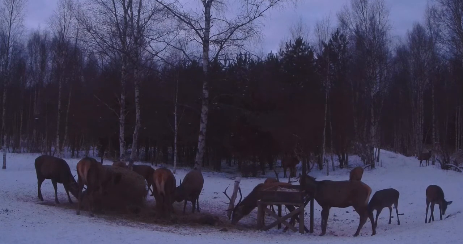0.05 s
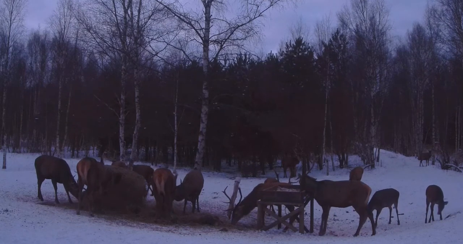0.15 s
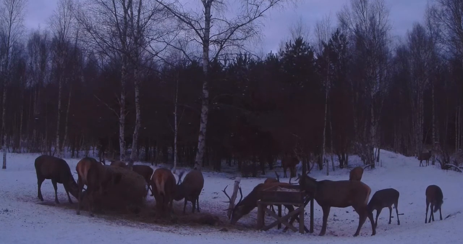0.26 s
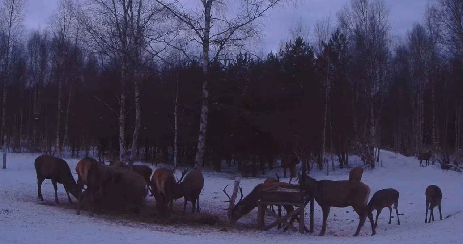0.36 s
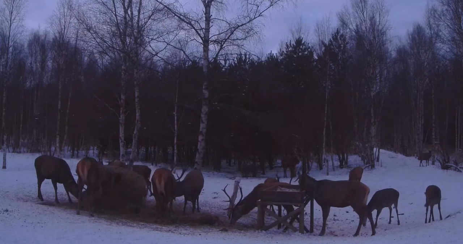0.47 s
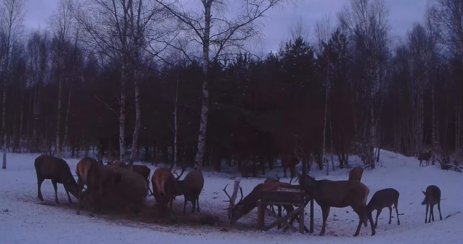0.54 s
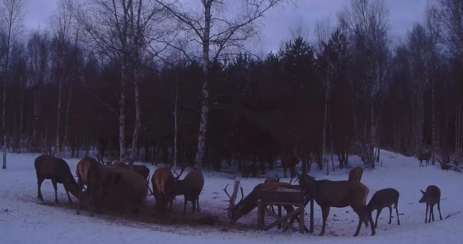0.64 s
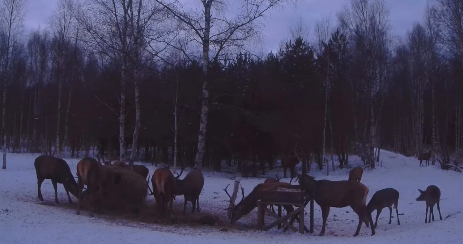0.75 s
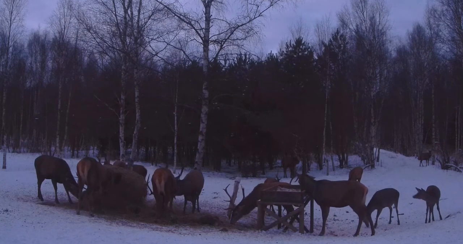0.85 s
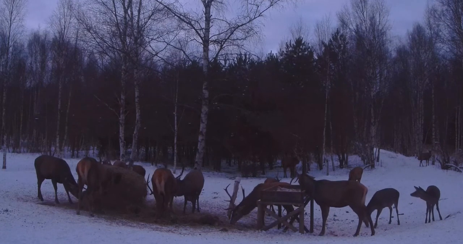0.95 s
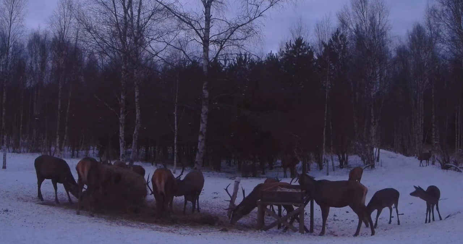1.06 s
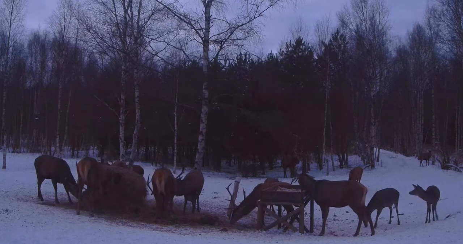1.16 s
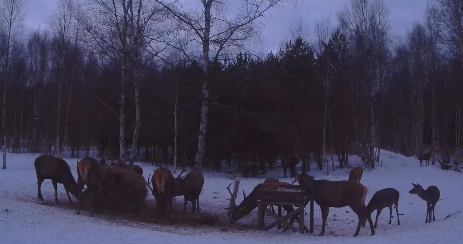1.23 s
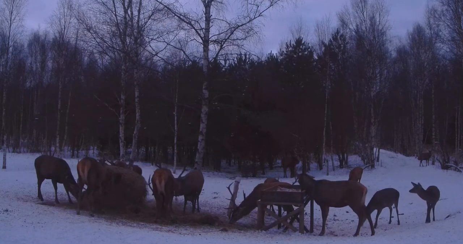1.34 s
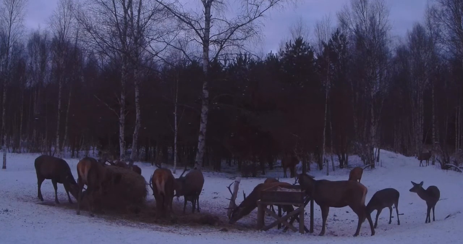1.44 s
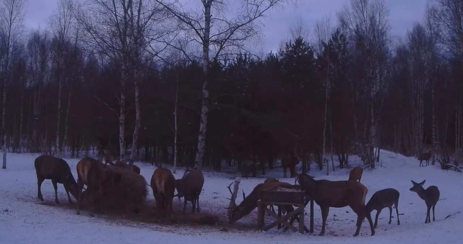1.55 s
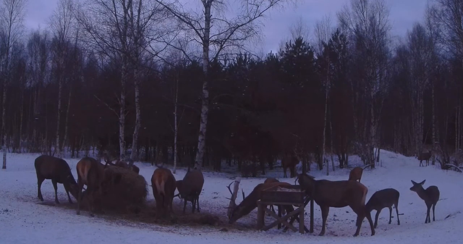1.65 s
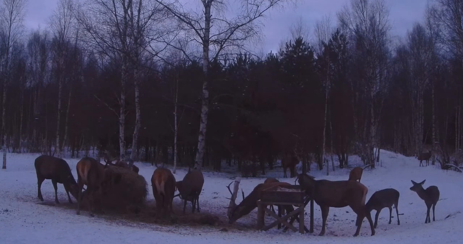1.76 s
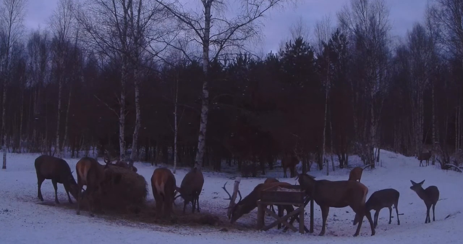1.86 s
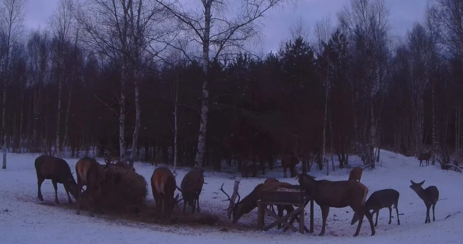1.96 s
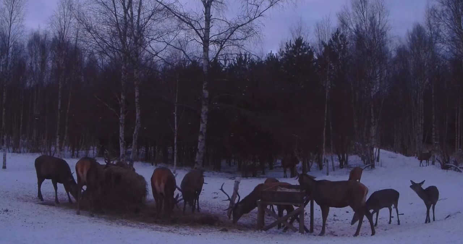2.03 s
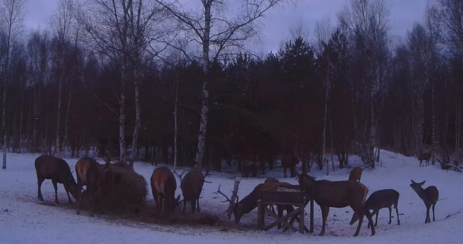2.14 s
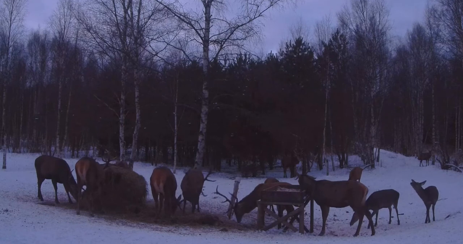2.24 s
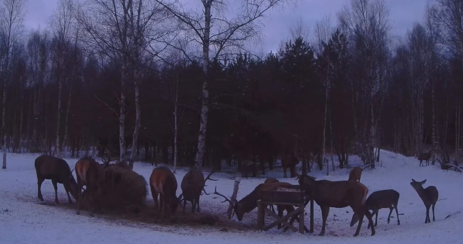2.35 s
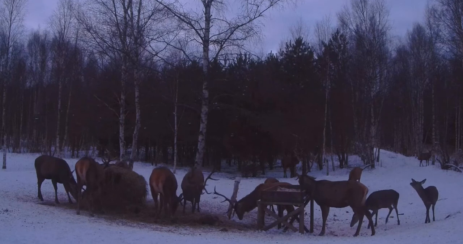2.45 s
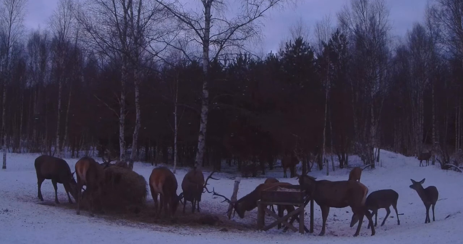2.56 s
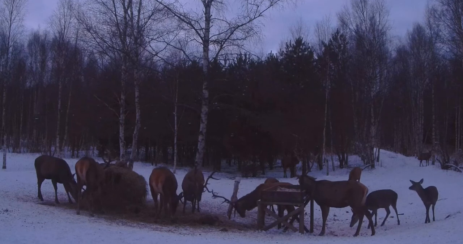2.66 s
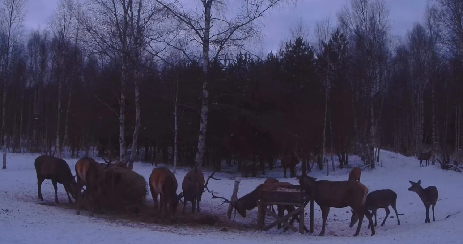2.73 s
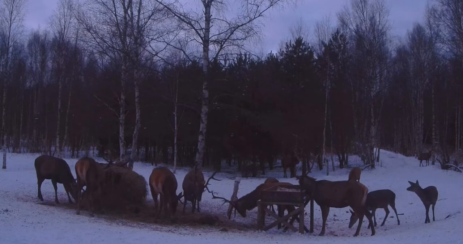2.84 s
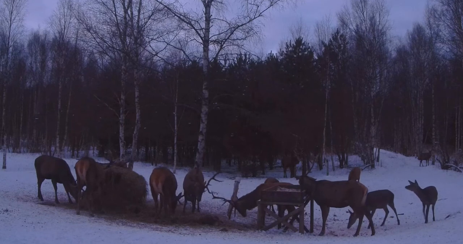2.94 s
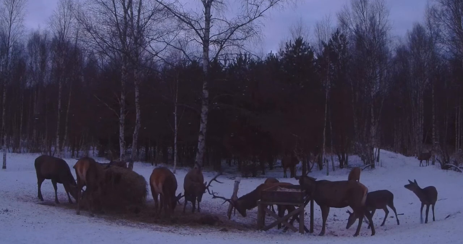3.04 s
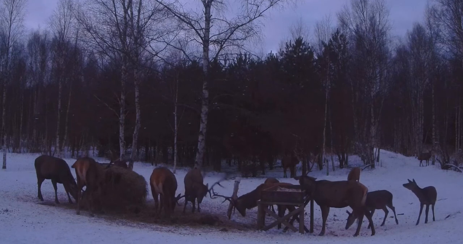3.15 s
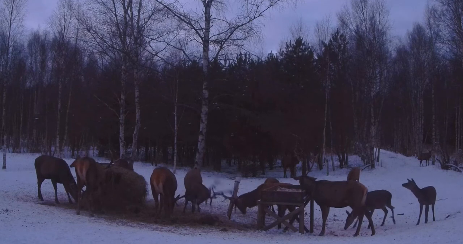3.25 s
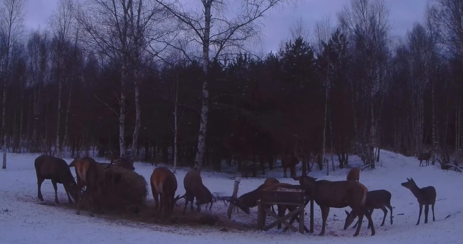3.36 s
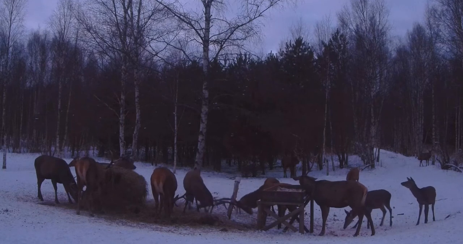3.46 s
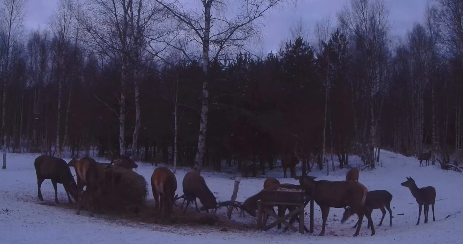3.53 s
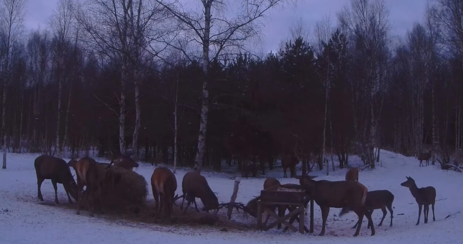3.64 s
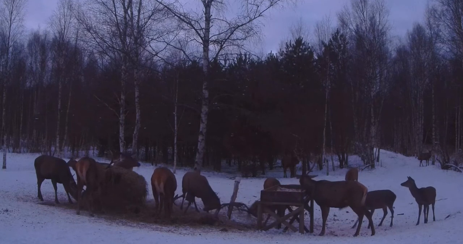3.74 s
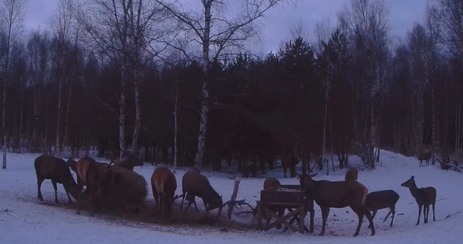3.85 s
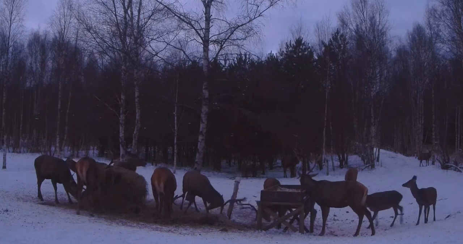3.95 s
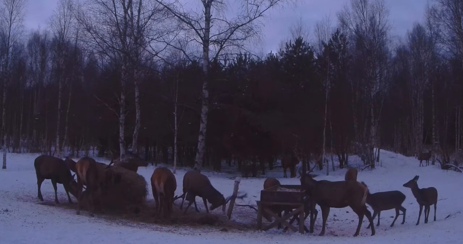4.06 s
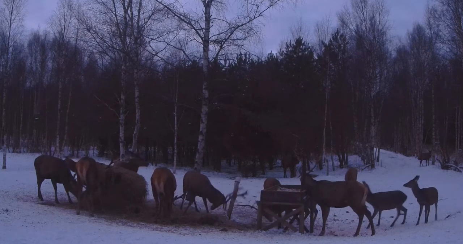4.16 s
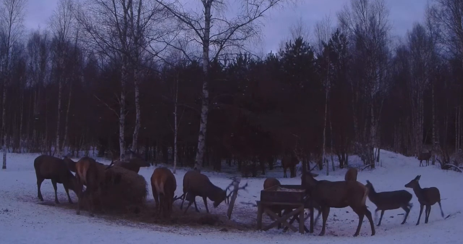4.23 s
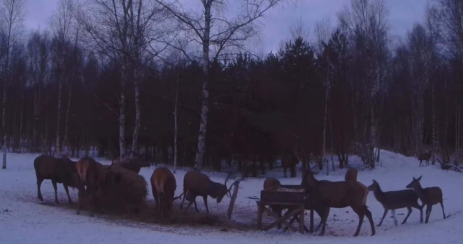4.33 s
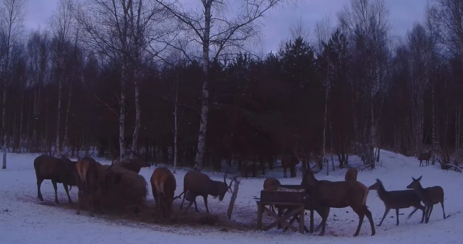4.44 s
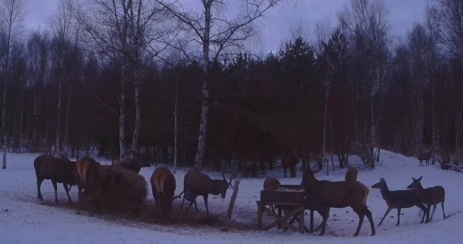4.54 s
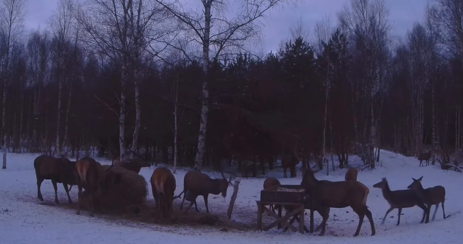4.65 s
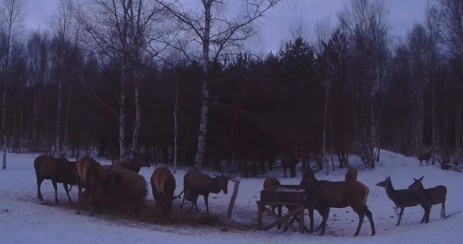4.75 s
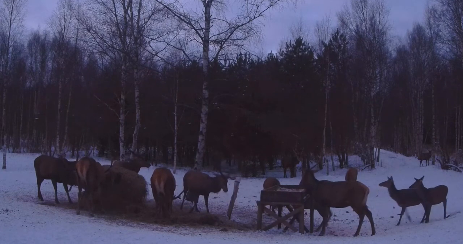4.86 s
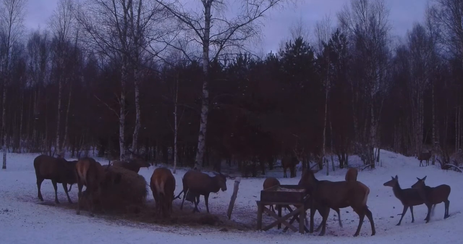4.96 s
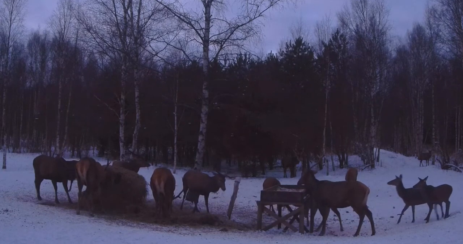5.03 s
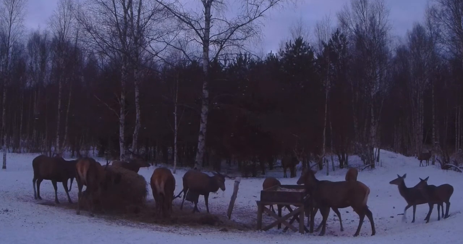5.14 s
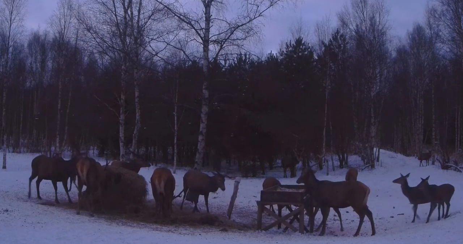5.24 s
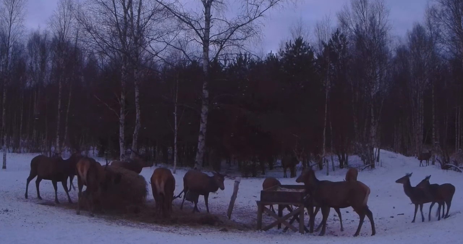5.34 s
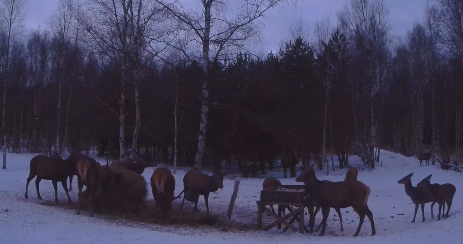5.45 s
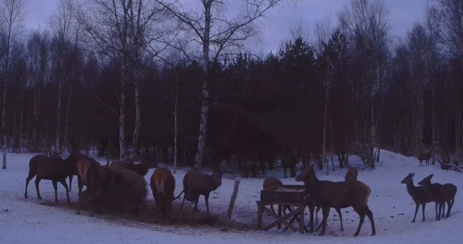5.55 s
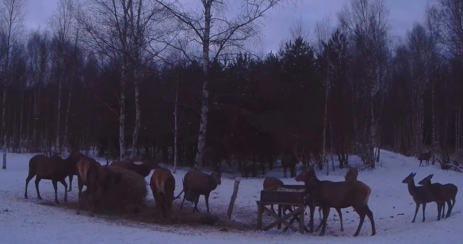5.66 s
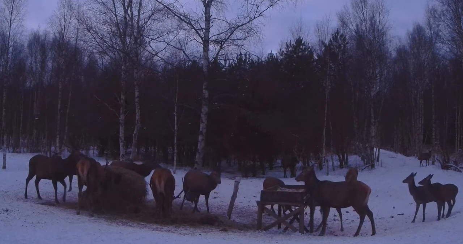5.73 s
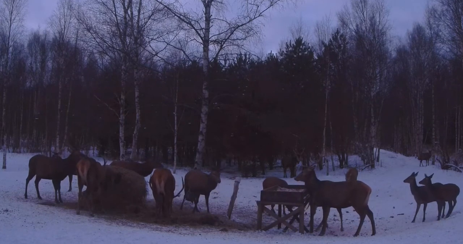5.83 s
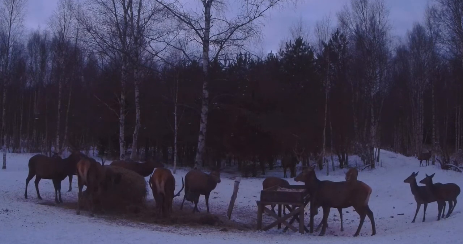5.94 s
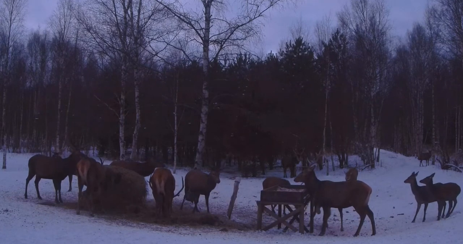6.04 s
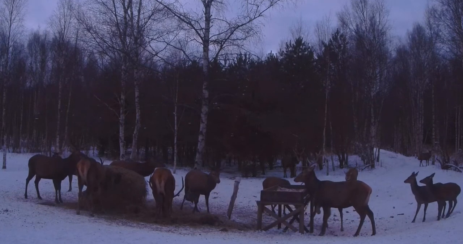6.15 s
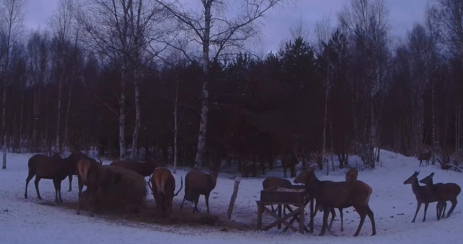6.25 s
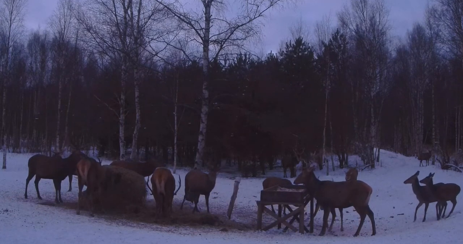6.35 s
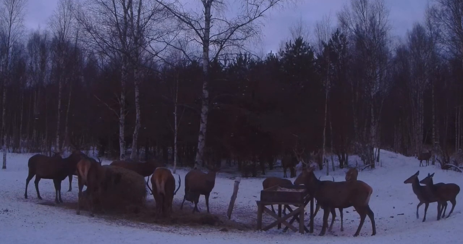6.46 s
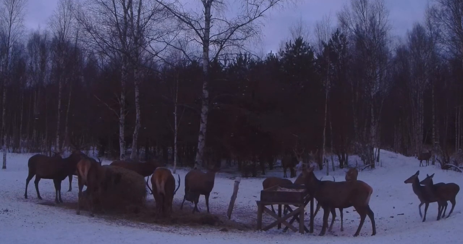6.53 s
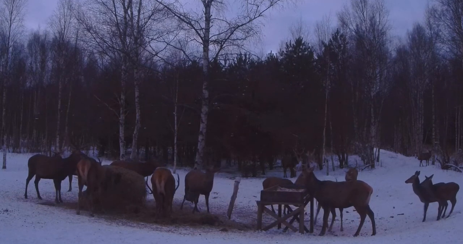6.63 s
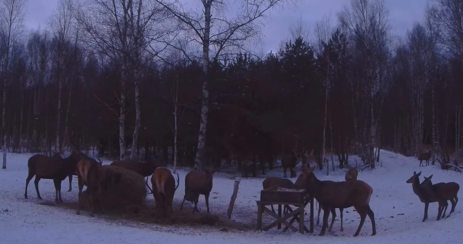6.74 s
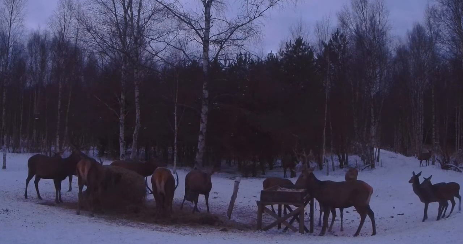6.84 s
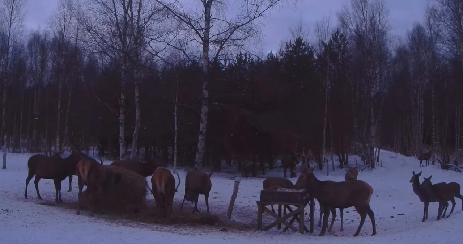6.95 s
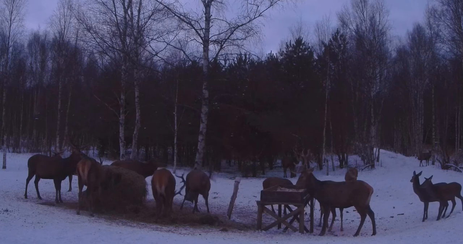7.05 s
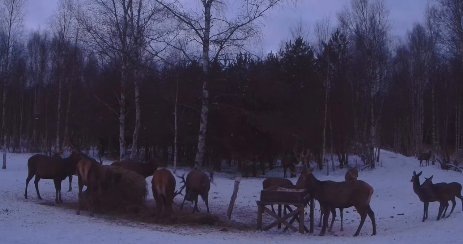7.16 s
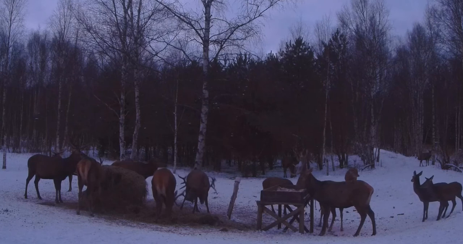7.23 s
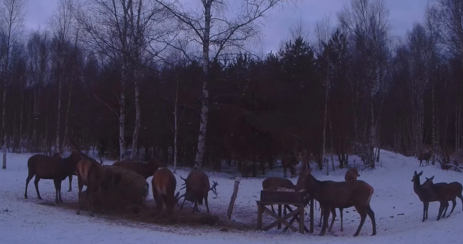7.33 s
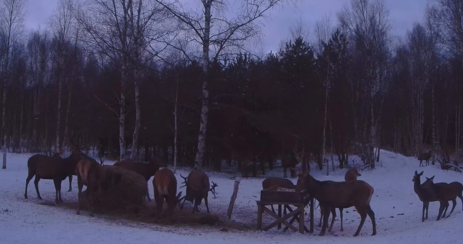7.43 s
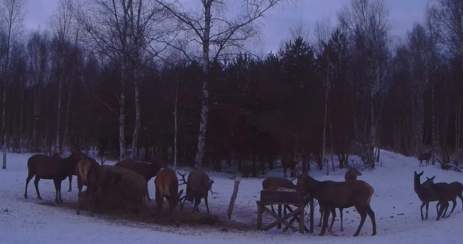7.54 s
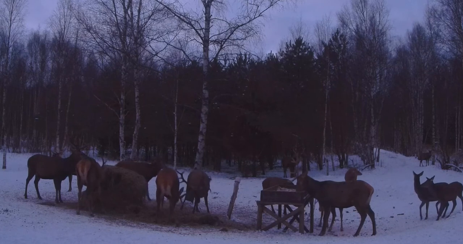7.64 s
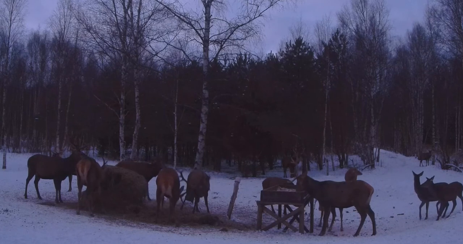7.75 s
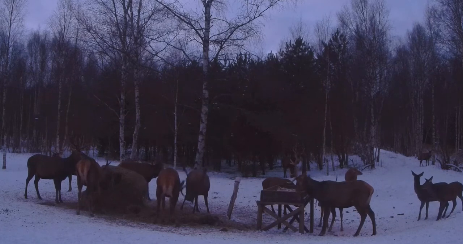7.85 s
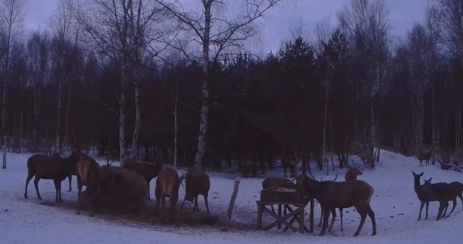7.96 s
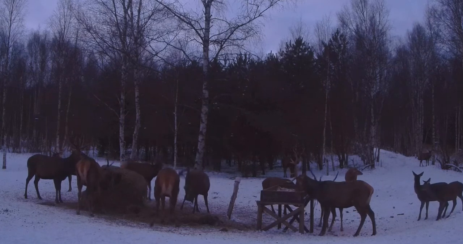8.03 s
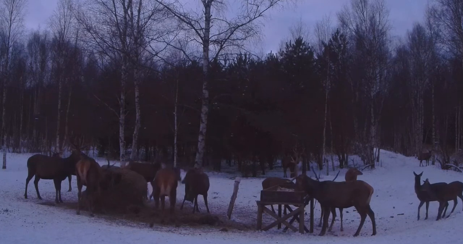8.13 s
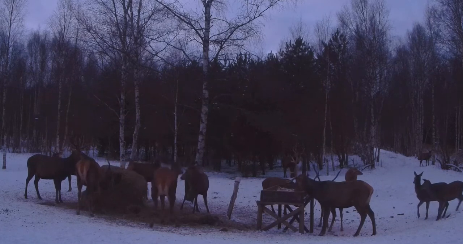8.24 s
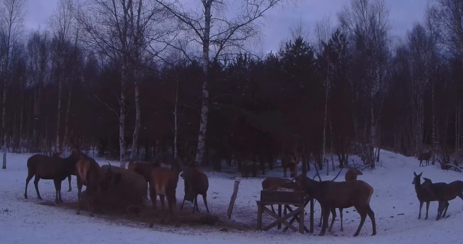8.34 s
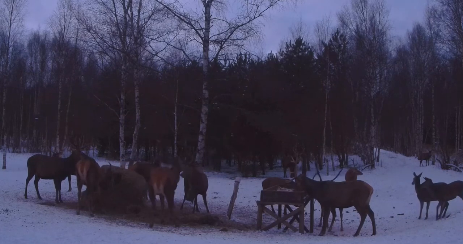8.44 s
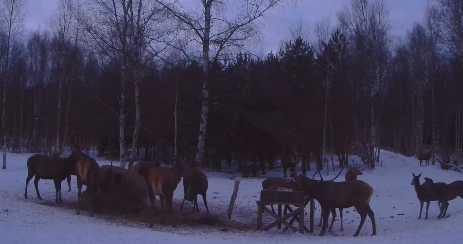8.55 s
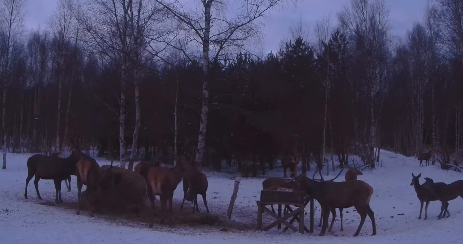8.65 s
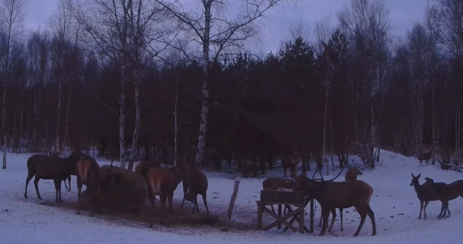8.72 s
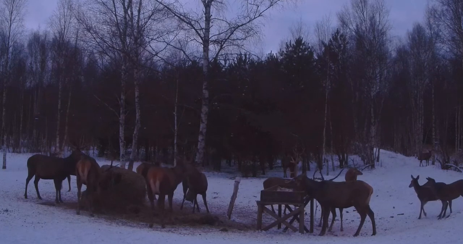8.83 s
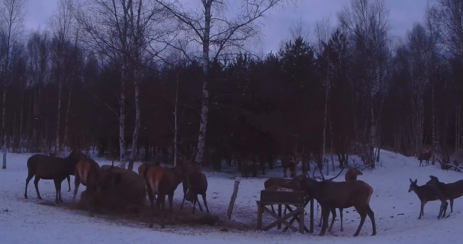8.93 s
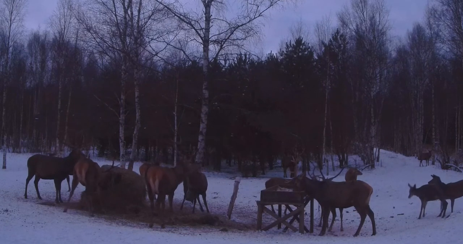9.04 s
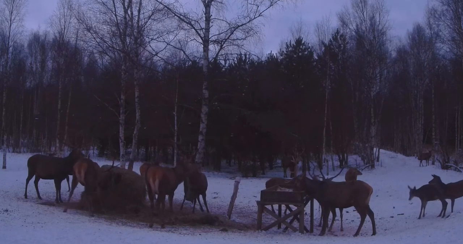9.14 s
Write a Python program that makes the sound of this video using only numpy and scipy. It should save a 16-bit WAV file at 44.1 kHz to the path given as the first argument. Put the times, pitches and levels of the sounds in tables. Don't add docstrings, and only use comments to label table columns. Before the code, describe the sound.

Outdoors at a snowy forest edge, deer rustle softly in hay with small dry snaps and a few dull feeder knocks. Two stags then lock antlers: sharp bony clacks, a pause, chattering grinding and a heavy crusty crunch. Wooden knocks follow, then a second short burst of clacks, fading into rustle. Soft woodland echo, faint treetop roar and low wind buffeting on a fixed microphone at some distance.

```python
import sys
import numpy as np
from scipy import signal
from scipy.fft import rfft, irfft
from scipy.io import wavfile
from scipy.ndimage import uniform_filter1d

SR = 44100
rng = np.random.default_rng(int(sys.argv[2]) if len(sys.argv) > 2 else 0)


def invert_db(level):
    return 10 ** (np.asarray(level, dtype=float) / 20)


def put_to_file(sound):
    columns = np.atleast_2d(sound).T
    safe = np.clip(columns, -1, 1)
    whole_steps = np.round(safe * 32767)
    wavfile.write(sys.argv[1], SR, whole_steps.astype(np.int16))


N = 405279

# pitch_hz [Hz], level_db [dB]
ANTLER = [(150, -20), (400, -12), (900, -6), (2000, -6), (3200, -1.5), (5000, -3), (8000, -2), (9500, -17),
          (15000, -26)]
PLANK = [(150, -26), (400, -16), (900, -5), (2000, -3.5), (4000, -6), (8000, -10.5), (9500, -16),
         (15000, -32)]
STALK = [(150, -44.5), (1200, -26), (3000, -9), (5000, -3.5), (8000, -4), (9500, -10), (15000, -22.5)]
# pitch_hz [Hz], time to fall 60 dB t60_s [s]
ANTLER_T60 = [(150, 0.092), (1000, 0.044), (3000, 0.016), (8000, 0.01), (15000, 0.0074)]
PLANK_T60 = [(150, 0.057), (1000, 0.039), (3000, 0.016), (8000, 0.017), (15000, .006)]
STALK_T60 = [(150, .011), (3000, 0.0067), (15000, 0.0041)]
SNAP_CHATTER_MS = 2.3
TICK_DB, TICK_PER_TIP = 1.5, 0.55


def evened(x):
    return x / np.sqrt(np.mean(x ** 2) + 1e-20)


def read(points, hz):
    f, value = np.transpose(points)
    return np.interp(np.log(hz + 1), np.log(f + 1), value)


def add(mix, s, sound):
    part = mix[round(s * SR):][:len(sound)]
    part += sound[:len(part)]


def noise(colour, size, curve, patchy_db, flicker_db, tilt=False):
    # pitch_hz [Hz], share [0 = none]
    dull = [(500, 1.1), (1500, 1.24), (3500, 0.35), (6000, 0), (16000, 0)]
    hop = size // 4
    frames, hz = N // hop + 5, np.fft.rfftfreq(size, 1 / SR)
    real, imaginary, patches = rng.standard_normal((frames, len(hz), 3)).T
    flicker = flicker_db * evened(uniform_filter1d(patches[0], size=3))
    patches = uniform_filter1d(uniform_filter1d(patches, size=8, axis=0), size=10, axis=1)
    level = read(colour, hz)[:, None] + patchy_db * evened(patches) + flicker
    inside = (hz >= colour[0][0]) & (hz <= colour[-1][0])
    z = (real + 1j * imaginary) * invert_db(level) * inside[:, None]
    scale = np.sqrt(np.mean(signal.istft(z, nperseg=size, noverlap=size - hop)[1] ** 2))
    columns = np.transpose(curve)
    if tilt:
        dullness_db = np.interp(np.arange(frames) * hop / SR, columns[0], columns[2])
        z = z * invert_db(read(dull, hz)[:, None] * dullness_db)
    x = signal.istft(z, nperseg=size, noverlap=size - hop)[1][:N] / scale
    return x * invert_db(np.interp(np.arange(N) / SR, columns[0], columns[1]))


def surges(rows, rise, fall):
    s, peak_db = np.transpose(rows)[:, :, None]
    late = np.arange(0, N, 64) / SR - s
    level = np.max(peak_db - np.maximum(-rise * late, fall * late), axis=0)
    return np.repeat(level, 64)[:N]


def body(colour, decay, low_db=0, tip_db=0, count=64):
    hz = 150 + 15000 * ((np.arange(count) + rng.random(count)) / count) ** 1.5
    low = 1 / (1 + (hz / 2200) ** 4)
    tip = 1 / (1 + (6200 / hz) ** 6)
    return np.c_[hz, read(decay, hz), read(colour, hz) + low_db * low + tip_db * tip]


def blow(peak_db, tones, modes, chatter_ms, spread_db=4., rise_ms=0, size=2600, tick_db=-99):
    t = np.arange(1500) / SR
    modes = modes + [0, 0, spread_db] * rng.standard_normal((len(modes), 1))
    hz, t60, db = np.vstack([tones, modes]).T[:, :, None]
    lag = 0.008 / (1 + (hz / 480) ** 2)
    swell = 1 - 0.7 * np.exp(-(t / lag) ** 2)
    decay = np.exp(-np.log(1000) / t60 * np.maximum(t - lag, 0))
    polarity = rng.choice([-1., 1.], hz.shape)
    rings = polarity * invert_db(db) * swell * decay * np.sin(2 * np.pi * hz * t)
    rings *= (1 - np.exp(-t / .00005)) * np.hanning(2 * len(t))[len(t):] ** 0.26

    ms = np.arange(size) * 1000 / SR
    sign, luck = rng.standard_normal((2, size))
    contacts = sign * (luck > 1.2) * invert_db(-20 * ms / max(chatter_ms, .2))
    contacts[0] = 2.63
    contacts *= np.minimum((ms + .1) / (rise_ms + 0.11), 1) * np.hanning(2 * size)[size:]
    spectrum = rfft(contacts, 2 * size)
    contacts = irfft(spectrum / uniform_filter1d(abs(spectrum), size=25))[:size]

    own = len(tones) * (rise_ms == 0)
    sound = signal.fftconvolve(contacts / np.linalg.norm(contacts), rings[own:].sum(0))
    add(sound, 0, rings[:own].sum(0) * (1 - np.exp(-t / 0.00042)))
    sound = sound / abs(sound).max()
    u = ms / 0.04 * invert_db(.7 * tick_db) - 4
    add(sound, 0, invert_db(tick_db) * (u * u - 1) * np.exp(-u * u / 2))
    return invert_db(peak_db) * sound / abs(sound).max()


def roar():
    # start_s [s], level_db [dB]
    air_level = [(0.0, -73), (1.18, -72.5), (1.79, -69), (2.28, -69.5), (2.66, -66), (3.15, -66.5),
                 (3.43, -69), (4.3, -71), (4.9, -70.5), (6.2, -72.5), (7.0, -72.5), (7.6, -70), (9.19, -71)]
    # pitch_hz [Hz], level_db [dB per Hz]
    air_colour = [(41, -35.5), (70, 2), (167, -16.5), (225, -11.5), (287, -12), (371, -14), (538, -14.5),
                  (751, -22), (1500, -33.5), (1950, -53.5), (3300, -120)]
    # start_s [s], peak_db [dB]
    stamps = [
        (3.37, -57),
        (3.7, -57),
        (3.88, -52.5),
        (4.17, -65.5),
        (4.45, -54.5),
        (4.66, -50),
        (6.5, -62),
        (7.11, -63),
        (7.31, -63),
    ]
    air = noise(air_colour, size=1024, curve=air_level, patchy_db=2.0, flicker_db=1.76)
    ground = noise(air_colour, size=1024, curve=[(0, 0), (10, 0)], patchy_db=1, flicker_db=1)
    return invert_db(0.8) * air + ground * invert_db(surges(stamps, rise=170, fall=95))


def wind():
    # pitch_hz [Hz], level_db [dB per Hz]
    wind_colour = [(5.9, -30), (10, 4.5), (38, -3), (47, -6.5), (59, -14), (76, -19), (134, -28.5),
                   (200, -30.5), (260, -60), (440, -120)]
    # start_s [s], peak_db [dB]
    gusts = [(.2, -54.5), (.4, -58.5), (.79, -54.5), (.97, -55), (1.28, -52), (1.5, -53), (2.06, -56.5),
             (2.33, -53), (2.62, -56), (2.95, -53), (3.53, -49), (3.71, -53), (3.89, -47.5), (4.05, -50.5),
             (4.43, -47), (4.66, -46.5), (4.81, -45.5), (5.15, -52.5), (5.37, -49.5), (5.65, -52),
             (5.91, -53.5), (6.65, -50), (6.94, -49), (7.13, -52.5), (7.34, -52.5), (7.56, -54.5),
             (7.9, -51.5), (8.29, -47.5), (8.57, -52.5), (9.19, -52.5)]
    calm_db = -59.5
    x = noise(wind_colour, size=4096, curve=[(0, 0), (10, 0)], patchy_db=.3, flicker_db=.1)
    power = uniform_filter1d(uniform_filter1d(x ** 2, size=2000), size=2000)
    x = evened(x / np.sqrt(power + .05))
    return x * invert_db(np.maximum(surges(gusts, rise=112, fall=60.5), calm_db))


def woods(x):
    # pitch_hz [Hz], t60_s [s]
    woods_t60 = [(150, 0.89), (1000, 0.8), (1800, 1.32), (3000, 0.67), (9000, 0.37), (16000, 0.13)]
    out, turn = np.zeros(N), np.arange(N) / 700
    for k in range(3):
        taps = np.zeros(SR)
        at = np.arange(220, SR - 20, 20)
        taps[at + rng.integers(0, 20, len(at))] = rng.choice([-1., 1.], len(at))
        hz, t, z = signal.stft(taps, SR, nperseg=256)
        early = 1 + 5.43 * invert_db(-60 * t / 0.054)
        fade = invert_db(-60 * t / read(woods_t60, hz)[:, None])
        tail = signal.istft(z * early * fade, SR, nperseg=256)[1]
        window = np.sqrt(2 / 3) * np.cos(turn + np.pi * k / 3)
        out += signal.fftconvolve(x * window, tail / np.linalg.norm(tail))[:N]
    return out


def crackle(x, per_s=260, spread_db=2.5, share=0.53):
    hits = (rng.random(N) < per_s / SR) * invert_db(spread_db * np.minimum(rng.exponential(1, N), 4))
    return x * (1 + share * signal.lfilter([1], [1, -.985], hits))


def rustle():
    # start_s [s], level_db [dB], dullness_db [dB]
    bustle = [(0.0, -76, -2), (0.67, -79, -2), (1.51, -75.5, -1.5), (2.0, -78.5, -0.5), (3.3, -77, -2.5),
              (3.48, -66, 6), (4.15, -70, -0.5), (4.5, -68, -5.5), (4.66, -61, 1), (4.91, -69, 3.5),
              (5.58, -70, -1.5), (6.14, -73.5, -4.5), (7.04, -74.5, 1), (7.14, -65.5, 3), (7.8, -74.5, 7.5),
              (7.98, -65, -1), (8.34, -76.5, 0), (9.19, -68.5, -1.5)]
    # pitch_hz [Hz], level_db [dB per Hz]
    hay_colour = [(290, -23.5), (500, -9), (880, 0), (1480, -3), (1900, -2.5), (2330, -5), (4280, -2.5),
                  (6610, -3.5), (7750, -2), (14200, -19), (16000, -24)]
    return crackle(noise(hay_colour, size=256, curve=bustle, patchy_db=2.0, flicker_db=-0.55, tilt=True))


def snaps():
    # start_s [s], peak_db [dB], pitch_hz [Hz]
    breaks = [(0.1074, -52, 3700), (0.1466, -50.5, 5380), (0.4363, -49, 6000), (0.817, -52.5, 8400),
              (0.9502, -53.5, 5880), (1.2198, -51, 2970), (1.246, -52, 7700), (1.945, -57, 3010),
              (2.4982, -48.5, 5000), (2.816, -57, 5200), (3.038, -55, 6460), (3.075, -59, 6300),
              (3.091, -59, 6000), (3.302, -56, 4500), (3.407, -41, 11000), (3.491, -48, 11480),
              (4.546, -47, 7500), (2.9485, -44.5, 5700), (3.15, -48.5, 7650), (3.236, -49.5, 6600),
              (3.258, -49, 7600), (3.2755, -42.5, 8110), (4.126, -44, 3130), (4.338, -43, 3480),
              (5.19, -42, 4640), (5.511, -52, 4240), (5.5834, -49, 5930), (5.7366, -49, 5420),
              (5.907, -51.5, 8470), (6.0093, -47.5, 8000), (7.7874, -49, 4660), (8.0925, -48.5, 5770),
              (8.239, -50.5, 2354), (8.4732, -47, 4200), (8.4885, -42.5, 7760), (8.651, -53.5, 7340),
              (8.674, -45.5, 5930), (8.75, -46, 8260), (8.89, -48, 5590)]
    # start_s [s], peak_db [dB], pitch_hz [Hz], crush_ms [ms]
    steps = [(.42, -59, 6040, 30), (2.44, -57.5, 9000, 30), (2.52, -52.5, 1710, 110),
             (4.66, -36, 6870, 150), (4.69, -44, 1800, 120), (5.58, -54, 5490, 66), (7.915, -47, 9460, 47),
             (8.47, -54, 6500, 54), (8.62, -60, 6500, 30), (8.80, -60, 5530, 35), (8.915, -50, 7870, 91),
             (8.93, -58, 1820, 56), (9.09, -53, 7460, 55)]
    out = np.zeros(N)
    for s, db, hz in breaks:
        add(out, s, blow(db - .1, [(hz, .006, 4.)], body(STALK, STALK_T60, count=32), SNAP_CHATTER_MS))
    for s, db, hz, crush_ms in steps:
        modes = body(STALK, STALK_T60, count=32)
        add(out, s, blow(db, [(hz, .003, 12.)], modes, 2 * crush_ms, rise_ms=16, size=9000))
    return out


def stray_ticks():
    # start_s [s], peak_db [dB], pitch_hz [Hz]
    strays = [
        (4.605, -50, 11000),
        (4.717, -36, 6500),
        (7.5098, -40, 4500),
        (7.5225, -44, 10000),
        (7.526, -40, 7500),
        (3.497, -35.5, 3400),
    ]
    out = np.zeros(N)
    for s, db, hz in strays:
        add(out, s, blow(db, [(hz, .006, 4.)], body(STALK, STALK_T60, count=32), SNAP_CHATTER_MS))
    return out


def trough_boom():
    # start_s [s], level_db [dB], pitch_hz [Hz]
    booms = [
        (1.65, -48, 2800),
        (1.65, -53, 1450),
        (4.64, -37, 1745),
        (6.49, -44.5, 976),
        (6.52, -48, 1790),
        (6.48, -48, 3800),
        (6.48, -47.5, 300),
        (7.5, -43, 1300),
        (7.5, -49, 1895),
        (7.924, -50.5, 1947),
    ]
    sent, t = np.zeros(N), np.arange(2000) / SR
    t60_s = .018
    for s, db, hz in booms:
        add(sent, s, invert_db(db - 60 * t / t60_s) * np.sin(2 * np.pi * hz * t))
    return sent


def feeder():
    # start_s [s], peak_db [dB], low_hz [Hz], high_hz [Hz], depth_db [dB]
    knocks = [(2.521, -43.5, 2000, 3100, -3), (2.805, -52.5, 1900, 3100, -3), (2.544, -48, 1410, 2100, 1),
              (2.764, -46.5, 2000, 1650, -3), (5.603, -40, 1510, 2850, -4.5),
              (5.948, -49.5, 1030, 4030, -2.5), (6.527, -48, 850, 1700, 0), (6.715, -51, 1000, 2100, -2),
              (6.878, -56, 2000, 3400, -2), (6.512, -41, 870, 2140, 5), (8.5, -54, 1900, 2530, 4),
              (6.844, -46, 2350, 2040, -6), (7.495, -31.5, 2440, 1920, -6), (7.937, -43, 730, 1920, -7.5)]
    out = np.zeros(N)
    for s, db, low_hz, high_hz, deep_db in knocks:
        tones = [(low_hz, .013, 10.0 + deep_db), (high_hz, .012, 11.5)]
        modes = body(PLANK, PLANK_T60, deep_db, 8.5 + 0.5 * db)
        add(out, s, blow(db - .5, tones, modes, chatter_ms=3.6))
    return out


def beam_answer():
    # start_s [s], peak_db [dB], pitch_hz [Hz]
    beam = [
        (3.357, -42, 167.4),
        (3.457, -37, 605),
        (3.858, -43, 420),
    ]
    out, t = np.zeros(N), np.arange(3000) / SR
    for s, db, hz in beam:
        swell = t * hz / 1.6
        add(out, s, invert_db(db) * swell * np.exp(1 - swell) * np.sin(2 * np.pi * hz * t))
    return out


def grinding():
    # start_s [s], peak_db [dB], tine_hz [Hz], beam_db [dB], tip_db [dB]
    grinds = [(3.4645, -29, 3200, -4.5, -19), (3.4715, -34, 5500, -12, -13.5),
              (3.4865, -36, 3600, -10, -18), (3.4796, -36, 2960, -10, -17), (3.4945, -36, 3550, -9, -23),
              (4.4077, -41, 4020, -18, -3), (4.4314, -35, 3750, -6, -10), (4.487, -31, 3880, -12, -18),
              (4.507, -30, 3850, -12, -16), (4.4949, -27.5, 2690, -20, -20), (4.653, -28.5, 3280, -7, -11),
              (4.6438, -22, 3920, -12, -12), (4.688, -24.5, 3600, -12.5, -17),
              (7.1512, -22, 4050, -18, -22)]
    out = np.zeros(N)
    for s, db, tine_hz, beam_db, tip_db in grinds:
        modes = body(ANTLER, ANTLER_T60, beam_db + 9.5, tip_db + 7.5)
        add(out, s, blow(db - 1.5, [(tine_hz, .014, 8.)], modes, chatter_ms=9.3, rise_ms=.3))
    return out


def antlers():
    # start_s [s], peak_db [dB], tine_hz [Hz], beam_db [dB], tip_db [dB]
    first_bout = [(3.4, -28, 2900, -8, -13), (3.4122, -28, 3200, -14, -10), (3.4143, -23.5, 2750, -13, -6),
                  (3.4424, -31.5, 2574, -14, -14.5), (3.5197, -30.5, 3000, -22.5, -30),
                  (3.6956, -31.5, 4110, -23.5, -27), (3.7155, -39, 3800, -17, -29),
                  (3.751, -39, 3430, -19, -22), (3.7675, -30, 4040, -13, -23),
                  (3.7771, -29, 4670, -22.5, -26), (3.818, -35, 3870, -13, -13),
                  (3.825, -33.5, 3890, -17.5, -17), (3.8379, -23, 3790, -19, -24),
                  (3.8671, -25.5, 4740, -21, -17), (4.0238, -39, 2670, -20, -9)]
    second_bout = [
        (7.1116, -17, 3270, -23, -20),
        (7.127, -23.5, 4950, -18.5, -2),
        (7.2784, -31.5, 4950, -28, -26),
        (7.3196, -36.5, 3830, -22, -22),
        (7.3662, -36, 4130, -25, -26),
        (7.5072, -39, 1500, -5, 0),
        (7.5235, -38, 8000, -9, 6),
        (7.803, -36.5, 4600, -39, -26),
    ]
    extra_contact = [
        (3.3530, -17.5, 7340, -14.5, -8),
        (3.3575, -21.5, 1100, -3.5, -6),
        (3.8543, -14, 2980, -24, -17),
        (3.4562, -20.5, 3600, -24.5, -24.5),
        (7.1135, -22.5, 1275, -12, -22),
        (7.1660, -34, 4500, -19, -18),
        (7.8035, -36.5, 6020, -35, -15),
        (7.793, -46.5, 520, 1, -35),
    ]
    out = np.zeros(N)
    for rows, ring_db in (first_bout + second_bout, -4), (extra_contact, -0.5):
        for s, db, tine_hz, beam_db, tip_db in rows:
            modes = body(ANTLER, ANTLER_T60, beam_db + 10.5, tip_db + 8.5)
            tone_db = ring_db - 0.28 * tip_db - 0.15 * db
            tick_db = TICK_DB + TICK_PER_TIP * tip_db
            add(out, s, blow(db - .5, [(tine_hz, .012, tone_db)], modes, chatter_ms=1.3, tick_db=tick_db))
    return out


def hard_blows():
    # start_s [s], peak_db [dB], dense_db [dB], tip_db [dB], echo_db [dB]
    clacks = [
        (3.3516, -9, -3, -1, -15),
        (3.4546, -11, -10, -13, -16),
        (3.8566, -11, -7.5, -14, -15),
        (3.9424, -13.5, -1.5, -2, -18),
        (7.0948, -10, 0, 5, -17),
        (7.1488, -15, -2.5, -5.5, -15),
        (7.2609, -16.5, -6, -7, -16),
        (7.348, -20.5, -4.5, -7.5, -14),
    ]
    # pitch_hz [Hz], width_hz [Hz], level_db [dB]
    clack_spots = [
        [(670, 100, -10), (1200, 110, -6), (1950, 100, -2.5), (2790, 110, -0.5), (3000, 82, -9),
         (4130, 200, -8.5), (5200, 95, -13), (7340, 91, -9)],
        [(1070, 120, -11.5), (3190, 110, -1), (5350, 100, -6), (6260, 270, -20), (7640, 140, -28)],
        [(748, 81, -12.5), (2085, 150, -10.5), (2800, 150, 0.5), (3250, 99, -3), (4510, 160, -0.5),
         (6100, 99, -16), (7640, 130, -24)],
        [(2660, 62, -8), (3830, 110, -2.5), (4600, 96, -13), (5300, 99, -13), (6100, 140, -5.5), (7460, 500, 1),
         (8000, 230, -8)],
        [(1097, 71, -3), (2780, 80, -3), (3500, 77, -7), (4090, 130, -4.5), (4330, 69, -4), (5610, 140, -3),
         (6100, 170, -11), (7180, 160, -8.5)],
        [(1186, 150, -9.5), (2240, 110, -8.5), (3540, 120, -0.5), (4400, 96, -5), (4800, 130, -5),
         (7010, 100, -19), (7400, 160, -12)],
        [(530, 100, -16.5), (1355, 100, -12), (3880, 120, -6), (4240, 200, 1.5), (6200, 260, -4),
         (6870, 190, -11)],
        [(1170, 90, -13.5), (2750, 100, -16), (4180, 170, -1), (6850, 75, -21), (7070, 170, -18.5)],
    ]
    grinds = [
        (4.4189, -22, -2, -7, -7.5),
        (4.4793, -23, -5, -8, -7.5),
        (4.6394, -17.5, -2, -8, -6),
        (4.6737, -20.5, -2, -6, -7),
        (4.7415, -22, -1, -14, -8),
    ]
    grind_spots = [
        [(2520, 120, -12), (3190, 160, -8), (3740, 96, 0), (5880, 340, -22), (7570, 120, -11),
         (8210, 160, -14.5)],
        [(798, 150, 0), (1473, 210, -2), (2050, 110, -1.5), (2780, 92, -3.5), (3830, 140, -2), (5300, 95, -19),
         (6890, 120, -14)],
        [(974, 100, -1), (1532, 300, -4), (3000, 130, -2), (3360, 280, -1.5), (3890, 110, 1), (5420, 110, -2),
         (6540, 140, -12), (7050, 400, -10)],
        [(2900, 150, 1), (6100, 130, -6), (6530, 85, -2), (7120, 190, -1.5), (8450, 90, -14), (9800, 96, -28)],
        [(1740, 110, -7), (3130, 580, -0.5), (3620, 200, -2), (6200, 200, -12), (8010, 120, -21)],
    ]
    knocks = [
        (1.6437, -29, -1.5, 1, -14),
        (2.502, -42, -6, -10, -5),
        (6.472, -27, -3.5, -6, -10.5),
        (7.478, -30.5, -2, -11, -5.5),
        (7.924, -36, -1.5, 4, -9),
    ]
    knock_spots = [
        [(1325, 180, -3), (1590, 57, -5), (2810, 120, -0.5), (4410, 430, -9.5), (5200, 95, -15),
         (6040, 260, -9.5), (7200, 140, -21)],
        [(944, 260, -4), (1280, 60, -3), (1610, 76, -7), (2110, 110, -2), (2380, 110, -3)],
        [(850, 94, -1), (1910, 250, -1.5), (2620, 71, -10), (3670, 180, -9), (4670, 300, -13), (5400, 73, -13),
         (5610, 80, -12)],
        [(1140, 160, -11), (1680, 140, -3), (2530, 150, 0.5), (2970, 100, -3), (4400, 180, -12),
         (5860, 120, -17)],
        [(1910, 82, -2), (3850, 110, -2), (4440, 110, -3), (5930, 140, -3), (7400, 230, -7.5), (9980, 70, -21)],
    ]
    groups = ((clacks, clack_spots, ANTLER, ANTLER_T60, 1.8, 0),
              (grinds, grind_spots, ANTLER, ANTLER_T60, 9., .3),
              (knocks, knock_spots, PLANK, PLANK_T60, 4., 1.5))
    blurred = .7
    out, sent = np.zeros((2, N))
    for rows, spots, colour, decay, chatter_ms, rise_ms in groups:
        for (s, db, dense_db, tip_db, echo_db), spot in zip(rows, spots):
            hz, width, ring_db = np.transpose(spot)
            tones = np.c_[hz, 2.1 / width, ring_db + 20 * np.log10(width / 45)]
            modes = body(colour, decay, -8.0, tip_db) + [0, 0, dense_db]
            tick_db = TICK_DB + TICK_PER_TIP * tip_db - 20 * rise_ms
            sound = blow(db, tones, modes, chatter_ms, spread_db=3., rise_ms=rise_ms, tick_db=tick_db)
            add(out, s, sound)
            lines = rfft(sound)
            broad = np.sqrt(uniform_filter1d(abs(lines) ** 2, size=70))
            flatter = (broad / (abs(lines) + .2 * broad)) ** blurred
            add(sent, s, invert_db(echo_db) * irfft(lines * flatter))
    return out, sent


def scene():
    clack, grind, knock, snap = antlers(), grinding(), feeder(), snaps()
    hard, sent = hard_blows()
    sent = sent + trough_boom()
    wet = woods(sent + invert_db(-16) * clack + invert_db(-8) * grind + invert_db(-7.0) * knock + invert_db(-7.5) * snap)
    fight = hard + clack + grind + knock + snap + stray_ticks() + beam_answer()
    background = invert_db(3.0) * rustle() + roar() + invert_db(2.5) * wind()
    return (fight + wet + background)[None]


def top_cut(x):
    return signal.sosfilt(signal.butter(12, 16800, fs=SR, output="sos"), x)


def record(dry):
    return top_cut(dry)


dry = scene()
out = record(dry)
put_to_file(out)
```